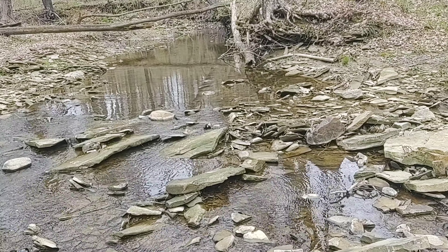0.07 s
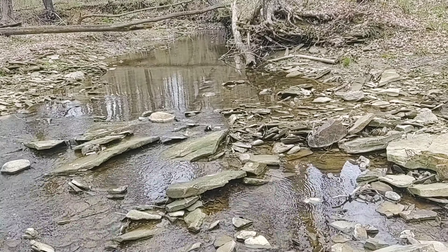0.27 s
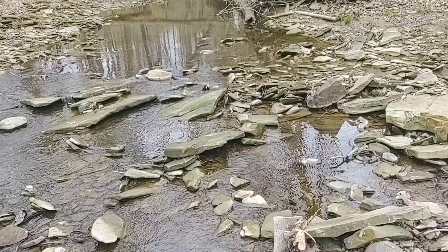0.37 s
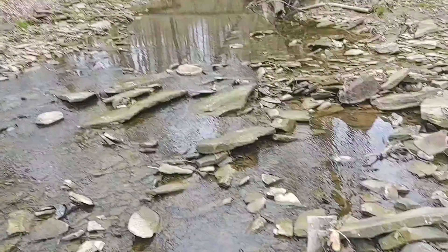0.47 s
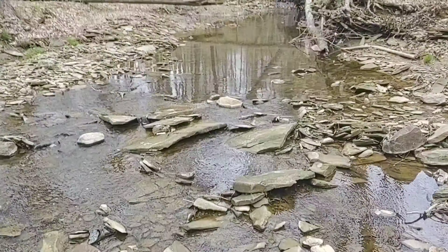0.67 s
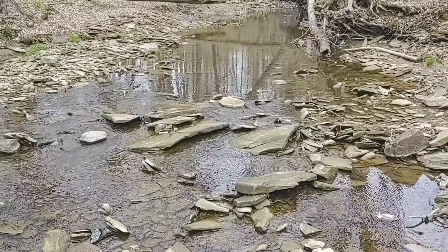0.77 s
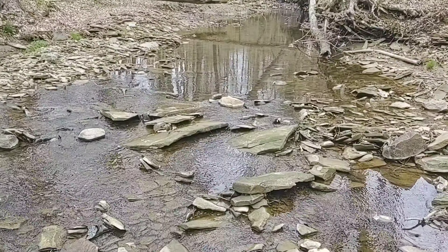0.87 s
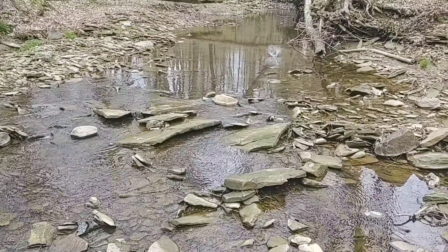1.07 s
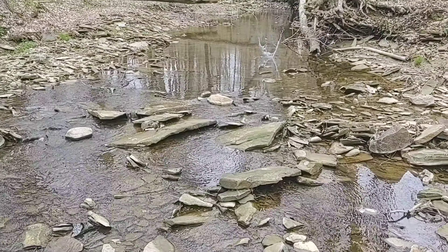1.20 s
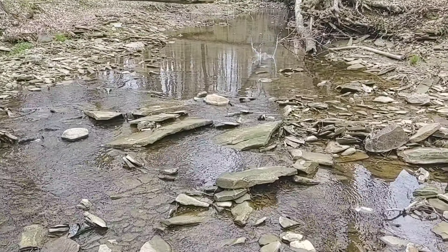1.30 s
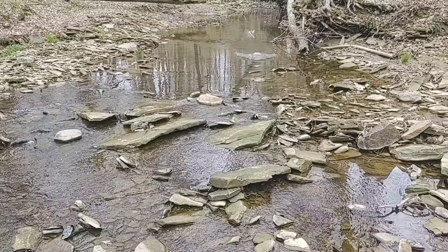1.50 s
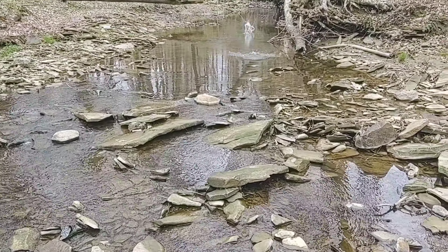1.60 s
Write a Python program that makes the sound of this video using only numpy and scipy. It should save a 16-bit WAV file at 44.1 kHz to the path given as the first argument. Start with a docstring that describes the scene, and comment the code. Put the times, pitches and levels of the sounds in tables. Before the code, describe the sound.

Close hard clacks in a quick cluster, then a soft splash and birdsong over quiet creek water

```python
"""Beside a shallow creek in a wood: trickling water over a low distant rumble, and a songbird's three-note phrase.
Dry knocks sound very close, with lighter ones between them: clicks into damped resonances, duller on the left.
Friction noise brushes the left microphone port, and someone shifts with a rustle and soft low bumps.
Faint ticks (noise bursts) and small water plops (short tones) are scattered around them.
The creek is banded noise plus tiny ringing drops, the rumble narrow noise, the bird gliding sines with a tail."""
import sys
import numpy as np
from scipy import signal
from scipy.fft import rfft, irfft
from scipy.io import wavfile

SR = 44100
rng = np.random.default_rng(int(sys.argv[2]) if len(sys.argv) > 2 else 0)


def generate_wav(sig):
    """Save sig (samples, or channels by samples) to the path in sys.argv[1] as 16-bit PCM at SR."""
    pcm = np.round(np.clip(np.atleast_2d(sig).T, -1, 1) * 32767).astype(np.int16)
    wavfile.write(sys.argv[1], SR, pcm)


N = 72765
T = np.arange(N) / SR
LOW_CUT_HZ = 66


def from_db(db):
    """Decibels to gain."""
    return 10 ** (np.asarray(db) / 20)


def rms_one(x):
    """Scale to unit RMS."""
    return x / np.sqrt(np.mean(x ** 2) + 1e-20)


def pan(db):
    """Left and right gains of constant power; positive dB favours the left."""
    return rms_one(from_db(np.array([[db], [-db]]) / 2))


def band(x, low_hz, high_hz, order=2):
    """Causal Butterworth band-pass."""
    top_hz = min(max(high_hz, low_hz * 1.05), 0.45 * SR)
    sos = signal.butter(order, [low_hz, top_hz], "band", fs=SR, output="sos")
    return signal.sosfilt(sos, x + 1e-18)


def at_hz(points, hz, axis=1):
    """Read one column of a table on a log-frequency axis."""
    points = np.array(points)
    return np.interp(np.log(hz), np.log(points[:, 0]), points[:, axis])


def level_curve(points):
    """Gain over time from rows of seconds and dB."""
    return from_db(np.interp(T, *np.transpose(points)))


def drift(rate_hz):
    """Random wander of unit RMS through two knots per cycle of the rate."""
    knots = rng.standard_normal(N // 8)
    return rms_one(np.interp(T * rate_hz * 2, np.arange(len(knots)), knots))


def coloured(spectrum, sides, patchy_db):
    """Stereo noise in narrow bands, each with its own level, flicker, likeness and balance."""
    out = 0
    edges_hz = np.geomspace(30, 17000, 25)
    white = rng.standard_normal((2, 2, N))
    for k, (low_hz, high_hz) in enumerate(zip(edges_hz, edges_hz[1:])):
        mid, side = band(white[k % 2], low_hz, high_hz)
        hz = np.sqrt(low_hz * high_hz)
        likeness = np.clip(at_hz(sides, hz), -1, 1)
        flicker_db = patchy_db * drift(22.124)
        gain = from_db(at_hz(spectrum, hz) + flicker_db) * pan(at_hz(sides, hz, axis=2))
        stereo = np.sqrt(1 + likeness) * mid + np.sqrt(1 - likeness) * side * [[1], [-1]]
        out = out + gain * stereo
    return rms_one(out)


def swell(s, rise_s, fall_s):
    """Exponential rise to a peak and fall from it."""
    return np.exp(-np.maximum((s - T) / rise_s, (T - s) / fall_s))


def round_tones(rows):
    """Short sine tones in the middle, each under one exponential swell."""
    out = 0
    for s, db, hz, rise_s, decay_s in rows:
        out = out + from_db(db) * swell(s, rise_s, decay_s) * np.cos(2 * np.pi * hz * (T - s))
    return out


def knocks():
    """One click into short resonances, smeared into a quick downward chirp; the left port hears it later and duller."""
    # Close knocks. Each row: click time in seconds, left-right balance in dB before the shadow,
    # left lag in ms, left dull above Hz, then the gain of each resonance from low to high in dB.
    strikes = [(0.4024, -1.5, 0.43, 1960, -0.5, -2.5, -7, 3, 6.5, 7, -27, -0.5, -23),
               (0.469, 9, 0.05, 2800, -5, -11, -17, -7, -15, -14, -23, -22, -35),
               (0.4718, 10, 0.23, 2800, -7, -15, -20, -1, -22, -20, -18, -23, -36),
               (0.4757, 0, 0.05, 2500, -9, -4, -3, -13, -22, -14, -19, -26, -40),
               (0.5160, 16, 0.0, 3970, -3, -4.5, -28, -12, -30, -26, -7, -27, -40),
               (0.5211, 30, 0.0, 2960, 1, -12, -5, -21, -30, -27, -14, -31, -42),
               (0.561, -2, 1.223, 1810, 4.5, 16.5, 13.5, 6, 1, 7.5, -3, -4, -10),
               (0.58, 26, 0.03, 3460, -28, -4, 3.5, -22, -6, -15, -25, -27, -38),
               (0.6213, 18, 0.18, 7000, 4.5, 9, 5.5, 5.5, -15.5, -9, -28, -12, -13.5),
               (0.6244, 28, 0.0, 5960, -12, -25, -5, -16, -30, -17, -22, -15, -23)]
    # Heavily damped resonances. Each row: centre in Hz, width in Hz.
    modes = [(240, 275), (660, 392), (1220, 333), (1850, 710), (2880, 480), (3750, 590), (4900, 560),
             (5950, 510), (10000, 17000)]
    smear_s, smear_hz = 0.27e-3, 7700
    top_hz = 12400
    shadow_leak = 0.11  # share of the treble that still reaches the left port
    out = 0
    hz = np.arange(N // 2 + 1) * SR / N
    # all-pass: lows delayed most
    smear = np.exp(-2j * np.pi * smear_s * smear_hz * np.arctan(hz / smear_hz))
    for s, pan_db, lag_ms, dull_hz, *levels_db in strikes:
        click = np.zeros(N)
        click[int(s * SR)] = 1
        body = 0
        for k, (db, (centre_hz, width_hz)) in enumerate(zip(levels_db, modes)):
            low_hz = max(centre_hz - width_hz / 2, LOW_CUT_HZ)
            ring = band(click, low_hz, centre_hz + width_hz / 2)
            body = body + (-1) ** k * from_db(db) * ring
        right = rfft(band(body, LOW_CUT_HZ, top_hz, order=4)) * smear
        shadow = shadow_leak + (1 - shadow_leak) / (1 + (hz / dull_hz) ** 4)
        lag = np.exp(-2j * np.pi * hz * lag_ms / 1000)
        left = right * shadow * lag
        out = out + pan(pan_db) * irfft(np.array([left, right]), N)
    return out


def ring_on(dry_knocks):
    """Loose grit keeps each knock sounding for a few milliseconds: convolution with decaying noise."""
    grit_db, grit_decay_s = -14.5, 0.002
    grit = rms_one(rng.standard_normal((2, N)) * np.exp(-T / grit_decay_s)) / np.sqrt(N)  # unit energy
    return dry_knocks + from_db(grit_db) * signal.fftconvolve(dry_knocks, grit, axes=1)[:, :N]


def brushes():
    """Grainy friction and low bump noise swell and fade with each brush on the port."""
    # Brushes on the left port. Each row: peak in seconds, rise in s, fall in s, friction in dB, low bump in dB.
    strokes = [(0.504, 0.0067, 0.0045, -45, -45.5), (0.521, 0.012, 0.0035, -39.5, -37),
               (0.5545, 0.0051, 0.011, -30, -47), (0.578, 0.0048, 0.003, -42, -30),
               (0.614, 0.0066, 0.0069, -35, -36), (0.631, 0.0046, 0.0055, -34, -36),
               (0.663, 0.0075, 0.025, -42, -54)]
    # Friction spectrum. Each row: frequency in Hz, relative density in dB per Hz.
    spectrum = [(200, -16), (450, 8.5), (1000, -5), (1900, 4), (2800, -10.5), (3600, -11.5), (5200, -13.5),
                (7500, -25.5), (15000, -33)]
    # Friction stereo. Each row: frequency in Hz, left-right likeness (-1 to 1), left-right balance in dB.
    sides = [(2480, 0.034, 12.5), (5050, 0, 16), (12000, 0, -1)]
    grain = from_db(2 * drift(350))
    friction = rms_one(coloured(spectrum, sides, patchy_db=2.7) * grain)
    bump = pan(35) * rms_one(band(rng.standard_normal(N), 53.6, 340))
    out = 0
    for s, rise_s, fall_s, friction_db, bump_db in strokes:
        stroke = from_db(friction_db) * friction + from_db(bump_db) * bump
        out = out + swell(s, rise_s, fall_s) * stroke
    return out


def handling_bumps():
    """Soft low bumps of handling, as short sine tones."""
    # Each row: peak in seconds, level in dB, frequency in Hz, rise in s, decay in s.
    return round_tones([(0.285, -46.5, 83, 0.089, 0.014), (0.351, -34, 93, 0.0054, 0.0041),
                        (0.575, -31.5, 66, 0.0071, 0.0064), (0.705, -46.5, 110, 0.016, .015),
                        (1.568, -48.5, 101, 0.007, 0.0033)])


def movement():
    """Rustle and low handling rumble follow the same motion."""
    # Motion level. Each row: time in seconds, level in dB.
    motion = [(0.04, -63), (0.09, -56), (0.13, -51), (0.25, -47), (0.40, -45.5), (0.55, -47), (0.69, -49),
              (0.77, -55.5), (0.95, -56.5), (1.1, -69.5), (1.64, -63)]
    # Rustle spectrum. Each row: frequency in Hz, relative density in dB per Hz.
    spectrum = [(40, 13), (85, 1.5), (130, 3), (200, -2), (380, 4), (620, 1), (950, -4), (2000, -4),
                (4400, -13.5), (7500, -34), (15000, -32.5)]
    # Rustle stereo. Each row: frequency in Hz, left-right likeness (-1 to 1), left-right balance in dB.
    sides = [(60, -0.16, 7.5), (330, 0.8, 1), (725, 0.49, -3), (1370, -0.21, 2.5), (3140, -0.43, 1),
             (8000, 0.99, 10), (15100, -0.17, -10)]
    sway_hz, sway_db = 95.5, -6  # level relative to the rustle
    sway = rms_one(band(rng.standard_normal(N), sway_hz / 1.42, sway_hz * 1.3))
    rustle = coloured(spectrum, sides, patchy_db=2.16)
    return level_curve(motion) * (rustle + from_db(sway_db) * sway)


def whistle(s, length_s, from_hz, to_hz, db, pan_db):
    """One gliding, slightly wavering sine under a half-sine envelope."""
    waver = 0.00414  # RMS, as a fraction of the pitch
    u = np.clip((T - s) / length_s, 0, 1)
    pitch_hz = (from_hz + (to_hz - from_hz) * u) * (1 + waver * drift(150))
    phase = 2 * np.pi * np.cumsum(pitch_hz) / SR
    return from_db(db) * pan(pan_db) * np.sin(np.pi * u) * np.sin(phase)


def bird():
    """Pure whistles, falling, rising, then nearly held, with a decaying-noise tail scattered by the trees."""
    # Phrases. Each row: start in seconds, then the level of each of the three notes in dB.
    phrases = [(0.413, -52.5, -47, -53.5), (0.812, -45, -45, -47), (1.209, -50.5, -47.5, -53),
               (1.6, -51.5, -41, -34)]
    # Notes of a phrase. Each row: seconds after its start, length in s, start in Hz, end in Hz,
    # left-right balance in dB.
    notes = [(0, .040, 3694, 2920, -33), (0.056, 0.0246, 3546, 4214, -29), (0.121, .080, 2631, 2826, -40)]
    # One stray call, up and down. Each row: start in seconds, length in s, start in Hz, end in Hz,
    # level in dB, left-right balance in dB.
    stray_call = [(0.645, 0.0388, 2200, 2940, -50, -40), (0.673, 0.0256, 2800, 2390, -51.5, -24)]
    wood_t60_s, wood_db, wood_pan_db = 0.92, -2.5, -6.5
    song = sum(whistle(*note) for note in stray_call)
    for start_s, *notes_db in phrases:
        for db, (after_s, length_s, from_hz, to_hz, pan_db) in zip(notes_db, notes):
            song = song + whistle(start_s + after_s, length_s, from_hz, to_hz, db, pan_db)
    decay = from_db(-60 * T / wood_t60_s)
    trees = rms_one(rng.standard_normal((2, N)) * decay) / np.sqrt(N)  # unit energy
    tail = signal.fftconvolve(song.mean(0)[None], trees, axes=1)[:, :N]
    return song + from_db(wood_db) * pan(wood_pan_db) * tail


def ticks():
    """Ticks, scuffs and splashes: each a band of noise that rises at once and dies away within milliseconds."""
    # Each row: peak in seconds, level in dB, band centre in Hz, decay in s, left-right balance in dB.
    bursts = [(0.276, -52, 680, 0.054, 1), (0.336, -46, 2600, 0.0038, -23),
              (0.411, -56.5, 12000, 0.0062, -20), (0.424, -43.5, 790, 0.01, -12),
              (0.473, -55, 12800, 0.003, -21), (0.619, -45, 4500, 0.01, -3), (0.621, -51, 9900, 0.0053, -5),
              (0.713, -46, 1280, 0.011, -4), (0.914, -52.5, 1640, 0.026, 3),
              (1.0835, -52.5, 11900, 0.011, -17), (1.085, -52, 2620, 0.0095, -9),
              (1.084, -56.5, 4600, 0.0095, -10), (1.197, -59.5, 8000, 0.0024, -3),
              (1.5639, -42, 3360, 0.002, -7), (1.563, -60, 11600, 0.0046, -25),
              (1.571, -44.5, 3300, 0.0023, -9)]
    edge_ratio = 1.226  # band edge to centre
    out = 0
    for s, db, hz, decay_s, pan_db in bursts:
        grit = rms_one(band(rng.standard_normal((2, N)), hz / edge_ratio, hz * edge_ratio))
        out = out + from_db(db) * pan(pan_db) * grit * swell(s, 0.00043, decay_s)
    return out


def plops():
    """Small water plops, as short round sine tones."""
    # Each row: peak in seconds, level in dB, frequency in Hz, rise in s, decay in s.
    return round_tones([(1.293, -52.5, 485, 0.0045, 0.022), (1.560, -48.5, 790, 0.0035, 0.002),
                        (1.572, -51.5, 570, 0.0052, 0.0043)])


def trickle_drops():
    """Random clicks dealt among sixteen damped resonators, each drop ringing for a few cycles."""
    drops_per_s, spread_db = 830, 3.5
    ring_cycles = 2.3  # cycles to fall 60 dB
    sizes = from_db(spread_db * np.minimum(rng.exponential(1, N), 4)) * rng.choice([-1, 1], N)
    clicks = sizes * (rng.random(N) < drops_per_s / SR)
    dealt = rng.integers(0, 16, N)
    drops = 0
    for k, hz in enumerate(np.geomspace(9200, 16100, 16)):
        r = from_db(-60 * hz / (ring_cycles * SR))
        w = 2 * np.pi * hz / SR
        poles = [1, -2 * r * np.cos(w), r * r]
        ringing = signal.lfilter([np.sin(w)], poles, clicks * (dealt == k) + 1e-18)
        drops = drops + ringing / np.sqrt(hz)
    return rms_one(drops)


def creek():
    """A soft wash of banded noise with tiny drops ringing on top."""
    # Wash spectrum. Each row: frequency in Hz, relative density in dB per Hz.
    spectrum = [(40, 0), (70, 8), (130, -34), (200, -6.5), (330, 2.5), (650, -2), (1100, -5.5), (1500, -1),
                (2500, -7.5), (3600, -4.5), (5000, -10), (7200, -33.5), (10500, -22.5), (15500, -25.5)]
    # Wash stereo. Each row: frequency in Hz, left-right likeness (-1 to 1), left-right balance in dB.
    sides = [(60, 0.98, 40), (284, 0.97, 0), (650, 0.39, 0), (1450, -0.11, 2), (3260, -0.055, -2.5),
             (7000, 0.26, 10.5), (14700, -0.45, -7.5)]
    # Level of the trickling drops. Each row: time in seconds, level in dB.
    trickle = [(0.04, -102), (0.3, -67.5), (0.8, -71), (1.0, -74), (1.25, -81.5), (1.45, -71), (1.64, -71)]
    wash_db, drops_pan_db = -57.5, -25
    wash = from_db(wash_db) * coloured(spectrum, sides, patchy_db=2.0)
    return wash + level_curve(trickle) * pan(drops_pan_db) * trickle_drops()


def rumble():
    """A distant drone of narrow-band noise, nearly the same on both sides."""
    centre_hz, edge_ratio, level_db, side_gain = 112.3, 1.132, -59.5, 0.017
    noise = rng.standard_normal((2, N))
    mid, side = rms_one(band(noise, centre_hz / edge_ratio, centre_hz * edge_ratio))
    return from_db(level_db) * (mid + side_gain * side * [[1], [-1]])


def scene():
    """Everything heard on the bank."""
    close = ring_on(knocks()) + brushes() + handling_bumps() + movement()
    around = bird() + ticks() + plops()
    return close + around + creek() + rumble()


def record(dry):
    """The sound opens after a moment of silence; the deepest bass and the top are cut."""
    start_s, cutoff_hz = 0.029, 15650
    bass_cut = signal.butter(3, LOW_CUT_HZ, "high", fs=SR, output="sos")
    top_cut = signal.ellip(10, 0.1, 70, cutoff_hz, fs=SR, output="sos")
    thinned = signal.sosfilt(bass_cut, dry * (T > start_s))
    return signal.sosfilt(top_cut, thinned)


dry = scene()
out = record(dry)
generate_wav(out)
```